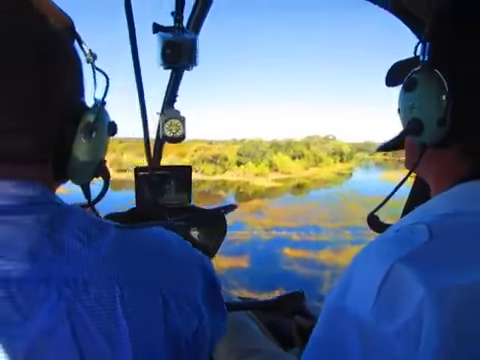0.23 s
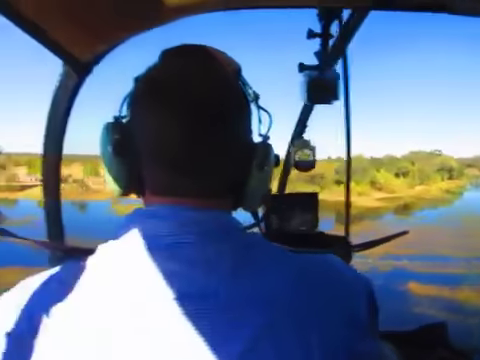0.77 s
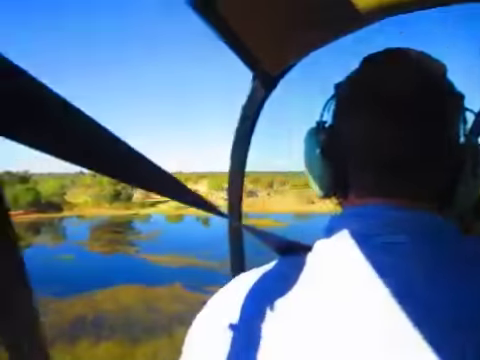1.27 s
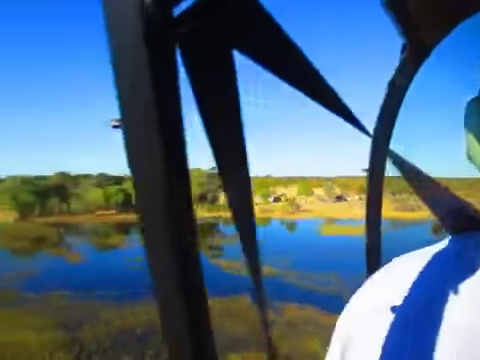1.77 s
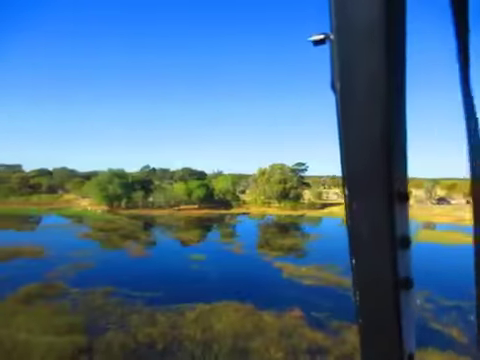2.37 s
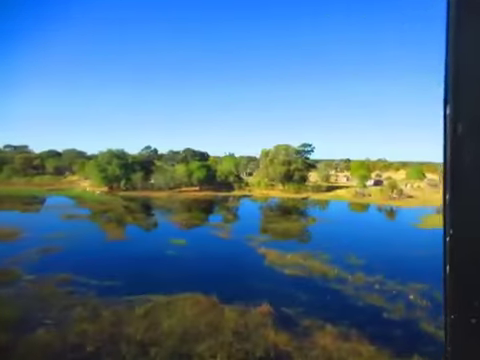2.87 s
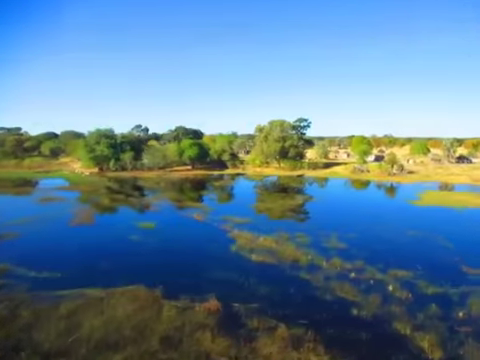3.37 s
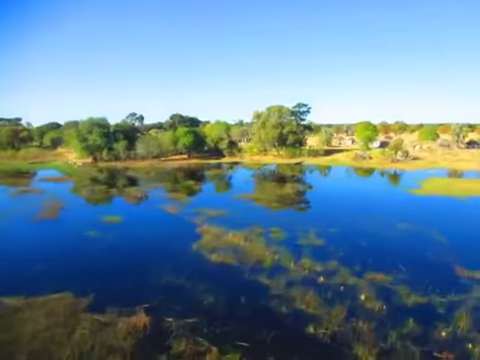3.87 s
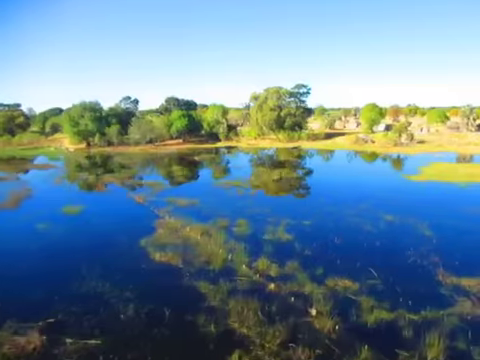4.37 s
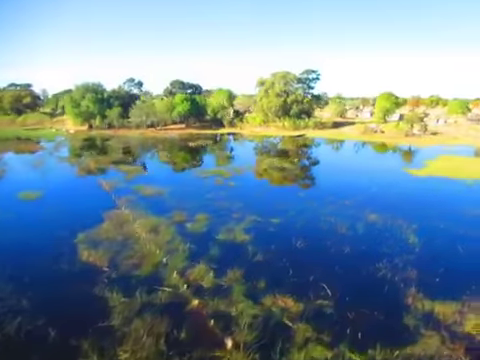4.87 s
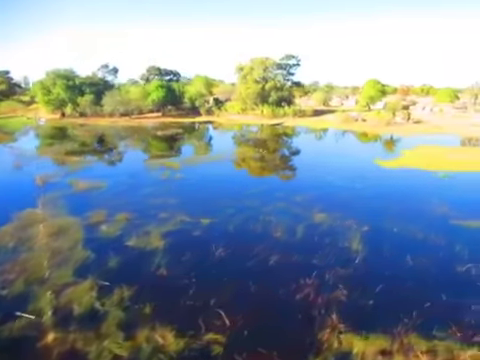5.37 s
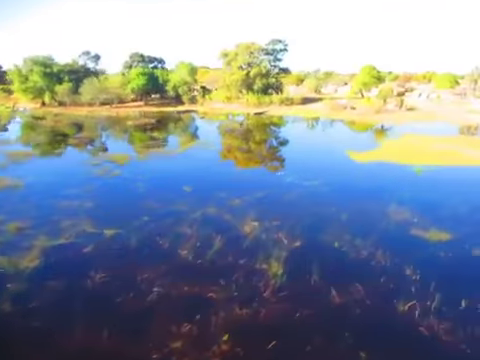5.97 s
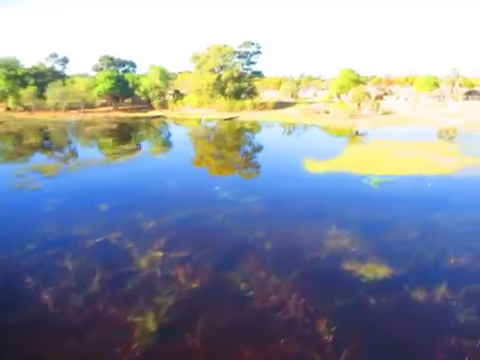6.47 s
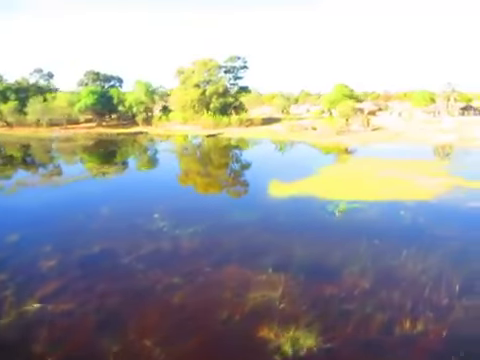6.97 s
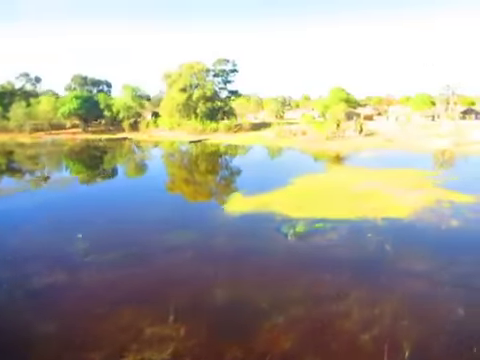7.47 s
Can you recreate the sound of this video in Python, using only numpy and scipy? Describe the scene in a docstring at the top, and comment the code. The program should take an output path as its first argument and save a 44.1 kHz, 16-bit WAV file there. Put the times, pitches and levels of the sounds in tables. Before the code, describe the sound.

A small helicopter is heard from inside its open cabin throughout. For the first second or so, the rotor dominates with rapid, even thumps and cracks, about fourteen a second, booming over a low engine and gear drone. Rushing air and a faint pulsing blade hiss run underneath. Between about 1.3 and 2.5 seconds, the slap softens and the drone starts to recede as the microphone turns toward the open doorway. From around 1.8 seconds, short irregular gusts sputter and rasp on the microphone over a heaving low rumble. Harder wind pops with small snaps hit near 3.6 seconds, cluster between 4 and 4.7, and come again from 5.8 to 6.4. The blade beat is weakest around 7 seconds, then builds quickly until the end at about 7.7 seconds, with the wind still buffeting.

```python
"""Small helicopter descending, doors off

Inside a two-bladed piston helicopter, the microphone turns from the cabin to the doorway. Each blade
thumps the cabin and cracks through the tip vortex of the last; as the slap eases, downwash takes over
and buffets the microphone. Engine, tail rotor and gears drone underneath; the blades swish overhead."""
import sys
import numpy as np
from scipy import signal
from scipy.fft import rfft, irfft
from scipy.io import wavfile
from scipy.ndimage import uniform_filter1d

SR = 44100
rng = np.random.default_rng(int(sys.argv[2]) if len(sys.argv) > 2 else 0)


def pcm_store(signal):
    """Save signal as 16-bit PCM."""
    levels = np.round(np.clip(np.atleast_2d(signal), -1, 1) * 32767)
    wavfile.write(sys.argv[1], SR, levels.astype(np.int16).T)


N = 340452
T = np.arange(N) / SR
BLADE_HZ, CAM_HZ, CYLINDERS = 13.67, 22.772, 6
UNIT_PULSE = np.sqrt(SR / BLADE_HZ)  # one such impulse per blade has rms 1


def undb(db):
    """Decibels to gain."""
    return 10 ** (np.asarray(db) / 20)


def unit(x):
    """Scale to rms 1."""
    return x / np.sqrt(np.mean(x ** 2))


def curve(table, at=T):
    """Rows of time and value, joined by straight lines."""
    return np.interp(at, *np.transpose(table))


def blend(cabin, door, doorway):
    """Pass from a cabin value to a doorway value as the microphone turns."""
    return cabin + (door - cabin) * doorway


def walk(rate):
    """Random levels held 1 / rate s and smoothed twice; rms 1."""
    hold = int(SR / rate)
    steps = np.repeat(rng.standard_normal(N // hold + 1), hold)
    return unit(uniform_filter1d(uniform_filter1d(steps, hold), hold)[:N])


def colour(x, spectrum, size=8192):
    """Causal filter of unit energy with the given spectral shape."""
    hz, db = np.transpose(spectrum)
    f = np.maximum(np.arange(size // 2 + 1) * SR / size, 1)
    cepstrum = irfft(np.log(undb(np.interp(np.log(f), np.log(hz), db))))
    cepstrum[1:size // 2] *= 2  # fold to minimum phase
    cepstrum[size // 2 + 1:] = 0
    response = irfft(np.exp(rfft(cepstrum)))
    return signal.fftconvolve(x, response / np.linalg.norm(response))[:N]


def noise(spectrum):
    """Coloured noise of rms 1."""
    return colour(rng.standard_normal(N), spectrum)


def pulses(times, sizes):
    """One impulse at each time."""
    index = np.round(times * SR).astype(int)
    inside = (index >= 0) & (index < N)
    return np.bincount(index[inside], sizes[inside], N)


def bursts(times, sizes, decay_s):
    """A puff of white noise at each time, rising fast and dying away."""
    age = T[:SR // 10] / decay_s
    return signal.fftconvolve(pulses(times, sizes), age * np.exp(1 - age))[:N] * rng.standard_normal(N)


def throb(cycles, centre, depth_db):
    """A gain that swells once a cycle, peaking at the share given by centre."""
    return unit(undb(depth_db * np.cos(2 * np.pi * (cycles - centre))))


def ring(x, hz, t60_s, rise_s=0.0079):
    """A damped resonance of unit energy that builds up as the sound crosses the cabin."""
    t = T[:SR // 4]
    mode = np.sin(2 * np.pi * hz * t) * (1 - np.exp(-t / rise_s)) * np.exp(-np.log(1000) * t / t60_s)
    return signal.fftconvolve(x, mode / np.linalg.norm(mode))[:N]


def tone(hz, db, start_cycles=0):
    """A steady machine tone that wavers in the moving air."""
    phase = 2 * np.pi * (hz * T + start_cycles) + 0.18 * walk(7)
    return np.sqrt(2) * undb(db + 0.14 * walk(2.3)) * np.cos(phase)


# The exhaust. Each row: multiple of the firing rate, level in dB in the cabin, then at the doorway.
EXHAUST_ORDERS = [(1, -23, -36.5), (2, -33, -39), (3, -52, -45)]

def exhaust(doorway):
    """The cylinders boom in the cabin; early in the turn the boom fades and wind makes the note waver."""
    outside = np.clip(doorway / 0.21, 0, 1)
    return sum(tone(order * CYLINDERS * CAM_HZ, blend(cabin, door, outside) + 1.24 * outside * walk(6.5))
               for order, cabin, door in EXHAUST_ORDERS)


# The engine. Each row: multiple of the camshaft rate, level in dB in the cabin, then at the doorway.
ENGINE_ORDERS = [(5, -28.5, -40.5), (7, -34.5, -45.5), (10, -35.5, -43.5), (14, -33.5, -51.5),
                 (15, -40.5, -55), (16, -34, -55.5), (17, -36, -57), (19, -42.5, -48), (20, -51, -54.5),
                 (33, -53, -55.5), (39, -75, -53.5)]
# Tail rotor and gears. Each row: pitch in Hz, level in dB in the cabin, then at the doorway.
DRIVE_TONES = [(81.1, -35, -45.5), (244.2, -40.5, -48), (393.3, -46, -50.5), (465.4, -46, -49),
               (496.6, -37.5, -49)]

def machinery(doorway):
    """Engine, tail rotor and gears drone; most of their tones fade towards the doorway."""
    lines = [(order * CAM_HZ, cabin, door) for order, cabin, door in ENGINE_ORDERS] + DRIVE_TONES
    return sum(tone(hz, blend(cabin, door, doorway), rng.random()) for hz, cabin, door in lines)


# Low rumble and broad rush of air at the microphone. Each row: frequency in Hz, relative level in dB.
RUMBLE_SPECTRUM = [(15, 4.5), (35, -0.5), (70, 3), (120, -0.5), (200, -6.5), (400, -24.5), (1000, -64)]
RUSH_SPECTRUM = [(60, -8), (130, -3), (250, 1), (380, -6.5), (550, -8), (800, -12.5), (1200, -19.5),
                 (2000, -31), (3000, -41.5), (4500, -58), (8000, -62.5), (15000, -66.5)]
# How each heaves with the wind. Each row: time in seconds, relative level in dB.
RUMBLE_LEVEL = [(0, -29), (1.3, -31), (2.2, -30.5), (2.65, -35), (2.95, -26.5), (3.3, -30.5), (3.9, -27),
                (4.25, -27.5), (4.7, -32), (5.45, -28), (5.8, -28.5), (6.05, -36.5), (6.4, -26), (6.8, -33),
                (7, -31), (7.3, -35.5), (7.72, -30)]
RUSH_LEVEL = [(0, -30), (1, -28), (1.5, -30), (2.2, -29.5), (2.6, -33.5), (3.7, -34), (4.2, -36),
              (4.6, -38.5), (5, -34), (5.5, -33.5), (6.1, -36.5), (6.43, -34), (6.7, -36), (7.4, -35),
              (7.72, -33.5)]

def downwash(doorway):
    """Turbulent air, pushed in waves behind each blade; at the doorway it lurches and flutters more."""
    rumble = noise(RUMBLE_SPECTRUM) * undb(curve(RUMBLE_LEVEL))
    chop = throb(BLADE_HZ * T, centre=0.21, depth_db=blend(2.5, 1, doorway))
    shoves = unit(undb(1.1 * doorway * walk(65)))
    exposure_db = 4.74 * np.sqrt(doorway) - 1
    rush = noise(RUSH_SPECTRUM) * chop * shoves * undb(curve(RUSH_LEVEL) + exposure_db)
    treble = signal.sosfiltfilt(signal.butter(1, 900, "high", fs=SR, output="sos"), rush)
    flutter = unit(undb(2.14 * walk(170))) * undb(-1.5 + 6.1 * doorway)
    return rumble + rush - treble + treble * flutter


# Blade hiss from overhead. Each row: frequency in Hz, relative level in dB.
SWISH_SPECTRUM = [(1500, -11), (3500, 3), (5500, 1), (8000, 0), (10500, 4.5), (11700, 3.5), (13500, -2),
                  (16000, -13)]
# Its strength at the microphone. Each row: time in seconds, level in dB.
SWISH_LEVEL = [(0, -64.5), (1.8, -61), (3, -62), (4.2, -65), (5.4, -62.5), (7, -63.5), (7.72, -60)]

def swish(doorway):
    """Blade hiss sweeps by once a pass, rising faster than it fades; it arrives earlier at the doorway."""
    sweep = BLADE_HZ * T + 0.27 * np.sqrt(doorway)
    sweep += 0.052 * np.cos(2 * np.pi * (sweep - .05))
    hiss = noise(SWISH_SPECTRUM) * throb(sweep, centre=0.23, depth_db=3.5)
    flicker_db = 1.54 * walk(90) + 1.5 * walk(450)
    return hiss * undb(curve(SWISH_LEVEL) + flicker_db)


# A narrow, high band inside the cabin. Each row: frequency in Hz, relative level in dB.
WHINE_SPECTRUM = [(9000, -35), (10900, -13), (11500, -10), (12000, -14), (13500, -40)]

def whine(doorway):
    """A thin whine, lost as the microphone turns away from the cabin."""
    return noise(WHINE_SPECTRUM) * undb(-72.5 - 22 * doorway)


def pressure_wave(shock_hz=1410, leak_hz=58):
    """One blade pass, centred in its window: pressure builds, drops in a shock, recovers and overshoots."""
    t = T[:SR // 20] - T[SR // 40]
    bow = 0.61 * np.exp(-((t + 0.0018) / 0.0017) ** 2)
    suction = 0.58 * (t >= 0) * np.clip(1 - t / 0.0024, 0, 1)
    rebound = 0.41 * np.exp(-((t - 0.0037) / 0.0017) ** 2)
    wave = signal.sosfilt(signal.butter(3, shock_hz, fs=SR, output="sos"), bow - suction + rebound)
    # bass escapes through the open doors
    return signal.sosfiltfilt(signal.butter(1, leak_hz, "high", fs=SR, output="sos"), wave)


# Snaps of the torn vortex overhead. Each row: delay in seconds, share of the crack.
VORTEX_SNAPS = [(.002, .31), (.0035, 0.23), (.0047, 0.17)]
# Those snaps and the tearing air, heard from below. Each row: frequency in Hz, relative level in dB.
CRACK_SPECTRUM = [(120, -15.5), (400, 9), (750, -3.5), (1300, -5.5), (2000, -22.5), (2900, -26.5),
                  (4200, -45.5), (9000, -51)]
TEAR_SPECTRUM = [(250, 2), (700, 10.5), (1250, -7), (2000, -15), (2800, -19), (4200, -59), (9000, -77)]

def vortex_crack(times, crack, second_times, second_share):
    """A blade meets the tip vortex of the last: a few quick snaps, torn air and a short wake."""
    snaps = sum(pulses(times + delay_s * (1 + 0.12 * rng.standard_normal(len(times))), share * crack)
                for delay_s, share in VORTEX_SNAPS)
    tear = bursts(times + 0.0012, 0.014 * crack, decay_s=0.0017)
    tear += bursts(second_times + 0.0012, 0.0094 * crack * second_share, decay_s=0.0018)
    wake = bursts(times, 0.02 * crack, decay_s=0.0063)
    return colour(snaps, CRACK_SPECTRUM) + colour(tear, TEAR_SPECTRUM) + colour(wake, RUSH_SPECTRUM)


# Air modes around the microphone. Each row: pitch in Hz, seconds to fall 60 dB, relative level in dB.
CABIN_MODES = [(96.1, 0.23, -20), (120.2, 0.3, -26), (201, 0.067, -27), (370, 0.09, -50),
               (674, 0.04, -33.5)]

def cabin_boom(times, knock_db):
    """Each blade rings the air in the cabin."""
    knocks = pulses(times + 0.0055, -UNIT_PULSE * undb(knock_db))
    return sum(ring(knocks * undb(db), hz, t60_s) for hz, t60_s, db in CABIN_MODES)


# Slap under the rotor, easing, then back at the end. Each row: time in seconds, relative level in dB.
SLAP_LEVEL = [(0, -4.5), (1, -4.5), (1.35, -6), (2.05, -10.5), (2.4, -14), (2.8, -13), (3.5, -14.5),
              (5.5, -15), (7, -26.5), (7.72, -12)]

def blade_slap(times, doorway, full_slap_db=-7, door_boom_db=-16):
    """Each blade sends a steep pressure wave, a crack and a second, softer thump; the cabin booms."""
    slap_db = curve(SLAP_LEVEL, times)
    turn = np.interp(times, T, doorway)
    thump_luck, crack_luck, second_luck, boom_luck = rng.standard_normal((len(times), 4)).T
    scatter_db = blend(0.7, 0.5, turn)  # no two blades crack alike
    thump = undb(slap_db + 0.4 * scatter_db * thump_luck)
    crack = UNIT_PULSE * undb(-31 + 0.98 * (slap_db - full_slap_db) + scatter_db * crack_luck)
    second_times, second_share = times + .022, undb(-5.5 + 0.73 * second_luck)
    rounded = uniform_filter1d(pulses(second_times, thump * second_share), size=64)
    waves = signal.fftconvolve(pulses(times, thump) + rounded, pressure_wave(), "same")
    boom = cabin_boom(times, slap_db + door_boom_db * turn + .5 * boom_luck)
    return waves + vortex_crack(times, crack, second_times, second_share) + boom


# Hollow notes in the cabin. Each row: middle and half length in seconds, pitch in Hz, relative dB.
HOLLOW_SWELLS = [(0.09, 0.11, 132, -31), (0.937, 0.18, 170, -30), (1.328, 0.54, 80, -27.5),
                 (1.923, 0.38, 252, -30), (2.72, 0.27, 136, -27), (3.276, 0.39, 224, -32.5),
                 (5.414, 0.17, 275, -30)]

def hollows(times):
    """Each swell is one resonance, struck by the passing blades and blown by the air between them."""
    strikes = pulses(times, np.full(len(times), -UNIT_PULSE))
    drive = undb(0.5) * strikes + undb(-8.5) * rng.standard_normal(N)
    return sum(ring(drive * undb(db) * np.exp(-((T - s) / half_s) ** 2), hz, t60_s=0.045, rise_s=0.0038)
               for s, half_s, hz, db in HOLLOW_SWELLS)


# Pop and rasp of air right on the microphone. Each row: frequency in Hz, relative level in dB.
POP_SPECTRUM = [(14, -11), (40, -39.5), (85, 8.5), (130, -5), (200, 0.5), (300, -8), (500, -21.5),
                (1000, -47), (2000, -54), (4000, -87), (9000, -74)]
RASP_SPECTRUM = [(200, 13.5), (700, 12), (1400, 4), (2300, -4.5), (3500, -19), (5500, -30), (9000, -36.5),
                 (15000, -51)]

def buffets(doorway, count=130):
    """Small eddies hit the microphone at random as dull pops with a short rasp, harder at the doorway."""
    when, size = rng.random((count, 2)).T
    times = when * N / SR
    strength = undb(12.6 * size) * np.interp(times, T, doorway)
    pops = pulses(times, undb(-7) * strength * rng.choice([-1, 1], count))
    rasps = bursts(times, undb(-41) * strength, decay_s=0.0013)
    return colour(rasps, RASP_SPECTRUM) + colour(pops, POP_SPECTRUM)


# The strongest gusts on the microphone, many shoved by a blade.
# Each row: middle in seconds, level there in dB, half length in seconds.
PORT_GUSTS = [(1.843, -30, 0.0058), (1.866, -23.5, 0.0055), (2.01, -28.5, 0.0079), (2.274, -42, 0.0031),
              (2.297, -27.5, .005), (2.428, -30, 0.006), (2.497, -32, .004), (2.784, -30.5, 0.0065),
              (2.936, -23.5, 0.0054), (3.004, -32, 0.017), (3.084, -32, .006), (3.236, -31, 0.0084),
              (3.304, -33, 0.0031), (3.381, -27, 0.011), (3.52, -29, .003), (3.578, -21, 0.0044),
              (3.594, -25.5, .004), (3.65, -25, .004), (3.746, -29, 0.0063), (3.897, -33, 0.0039),
              (4.185, -28, 0.011), (4.257, -29.5, 0.0036), (4.323, -28.5, 0.0079), (4.334, -27.5, .004),
              (4.414, -31.5, .01), (4.436, -24.5, .003), (4.479, -32, 0.0049), (4.655, -27, 0.0058),
              (4.806, -34, 0.0068), (5.134, -34, 0.0055), (5.157, -23.5, 0.0035), (5.286, -34, .005),
              (5.362, -28.5, 0.015), (5.427, -31, 0.011), (5.516, -24.5, 0.0058), (5.538, -32.5, 0.011),
              (5.589, -28, 0.0067), (5.659, -31, .005), (5.77, -33, 0.0075), (5.798, -20.5, 0.0043),
              (5.875, -29.5, 0.0092), (5.941, -29, 0.01), (5.969, -26.5, 0.0085), (5.994, -29, 0.013),
              (6.143, -33, 0.01), (6.312, -30, 0.013), (6.442, -30, 0.017), (6.513, -30, 0.0068),
              (6.534, -28, .005), (6.547, -28.5, 0.0045), (6.817, -30, 0.02), (6.883, -35, 0.0035),
              (7.028, -29.5, .009), (7.119, -36.5, 0.0023), (7.323, -34, 0.0088), (7.408, -32, 0.007),
              (7.623, -29, 0.0065)]

def gusts(sputter_hz=308.5):
    """Each gust swells and dies quickly, sputtering as eddies peel off the microphone port."""
    swell = np.zeros(N)
    for s, db, half_s in PORT_GUSTS:
        near = slice(*np.searchsorted(T, [s - 3 * half_s, s + 3 * half_s]))
        swell[near] += undb(db) * np.exp(-((T[near] - s) / half_s) ** 2)
    shedding = np.cumsum(sputter_hz * (1 + .3 * walk(200))) / SR
    sputter = throb(shedding, centre=0, depth_db=15)
    return colour(swell * rng.standard_normal(N) * sputter, RASP_SPECTRUM)


# Hard buffets on the diaphragm. Each row: release in seconds, pop level in dB, tick level in dB.
STALLS = [(3.584, 1, -52), (3.648, 0.5, -43), (4.001, 0, -55), (4.235, 3, -48), (4.25, 0, -57),
          (4.303, 0, -60), (4.396, -9, -47), (4.464, 4, -43), (4.69, 1, -49.5), (5.798, 4.5, -60),
          (5.992, -4, -46), (6.384, 4.5, -58)]
# Pop, tick and tearing air of the release. Each row: frequency in Hz, relative level in dB.
RELEASE_POP = [(25, -9), (80, 0), (200, -4), (600, -16), (2000, -35), (5000, -62), (15000, -88)]
RELEASE_TICK = [(1000, 5), (5000, -3), (11000, -6), (16000, -14)]
RELEASE_RASP = [(400, -8), (2000, 3), (4000, -5), (7000, -29), (15000, -38)]

def stall(roar):
    """A buffet pins the diaphragm for a few milliseconds, ducking the roar, then lets go with a snap."""
    times, pop_db, tick_db = np.transpose(STALLS)
    pinned = uniform_filter1d(pulses(times - .003, np.ones(len(times))), size=340) * 340
    duck = 1 - .7 * uniform_filter1d(pinned, size=100)
    pop = colour(pulses(times, -undb(pop_db)), RELEASE_POP)
    tick = colour(bursts(times, undb(tick_db), decay_s=0.00038), RELEASE_TICK)
    rasp = colour(bursts(times, undb(tick_db + 4.5), decay_s=0.0012), RELEASE_RASP)
    return roar * duck + pop + tick + rasp


# The microphone's turn. Each row: time in seconds, position from 0 (facing the cabin) to 1 (doorway).
MICROPHONE_TURN = [(0, 0.092), (1, 0.15), (1.8, 0.35), (2.6, 0.55), (3.5, 0.66), (4.6, 0.94), (7.72, 0.97)]
# The rotor loses and regains speed. Each row: time in seconds, lag behind an even beat in milliseconds.
ROTOR_LAG = [(0, 9.5), (.85, 9.4), (2.8, 13.8), (4.5, 11.7), (5.8, 18.5), (7.72, 21.5)]

def scene():
    """Rotor, drive train and air at one microphone, turning from the cabin to the doorway."""
    doorway = curve(MICROPHONE_TURN)
    beats = np.arange(int(N / SR * BLADE_HZ) + 1) / BLADE_HZ
    passes = beats + curve(ROTOR_LAG, beats) / 1000
    air = downwash(doorway) + buffets(doorway) + gusts()
    rotor = blade_slap(passes, doorway) + hollows(passes)
    drone = exhaust(doorway) + machinery(doorway)
    return stall(air + rotor + drone + swish(doorway) + whine(doorway))[None]


def record(dry, low_hz=17, top_hz=15550):
    """The camera's microphone drops the deepest bass and cuts the top."""
    thinned = signal.sosfilt(signal.butter(2, low_hz, "high", fs=SR, output="sos"), dry)
    return signal.sosfilt(signal.ellip(10, .2, 80, top_hz, fs=SR, output="sos"), thinned)


dry = scene()
out = record(dry)
pcm_store(out)
```